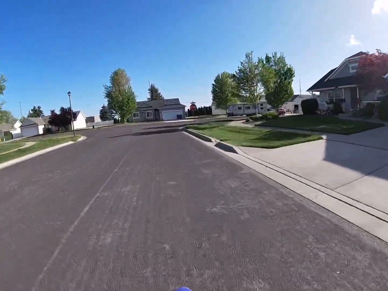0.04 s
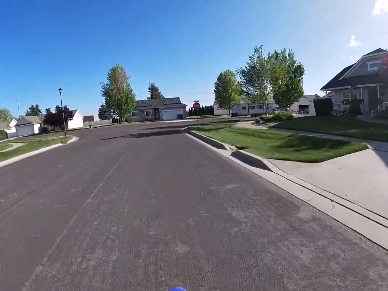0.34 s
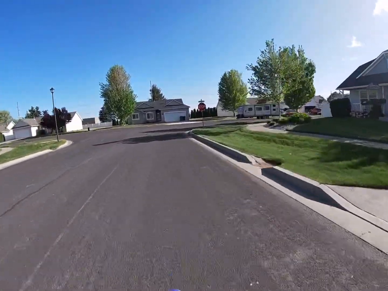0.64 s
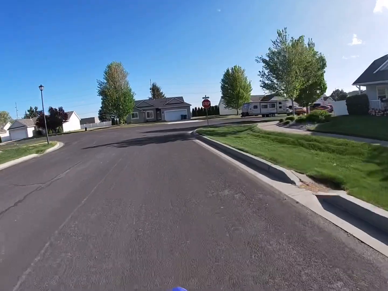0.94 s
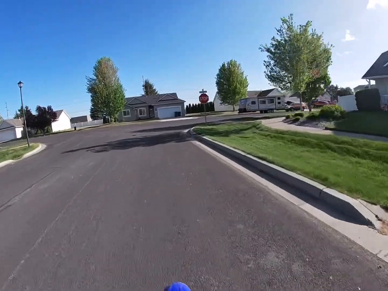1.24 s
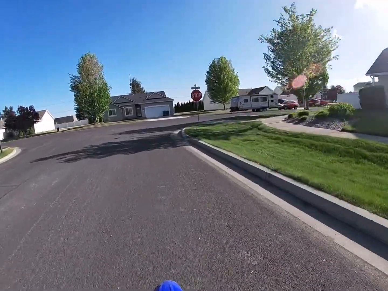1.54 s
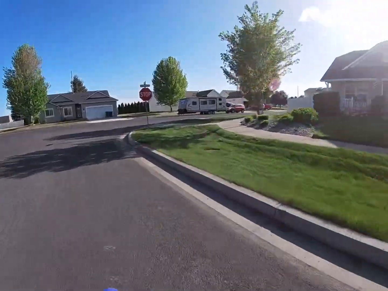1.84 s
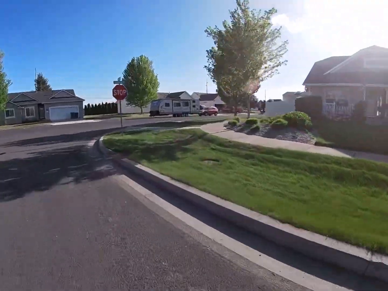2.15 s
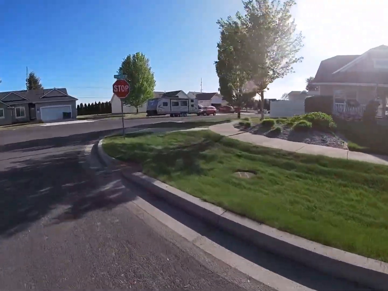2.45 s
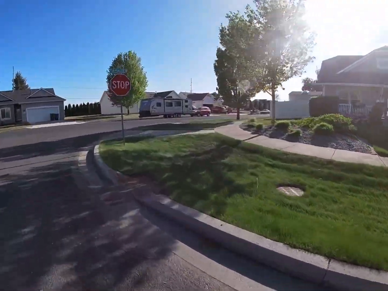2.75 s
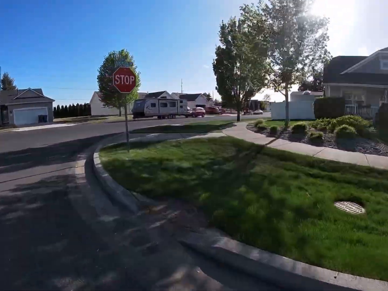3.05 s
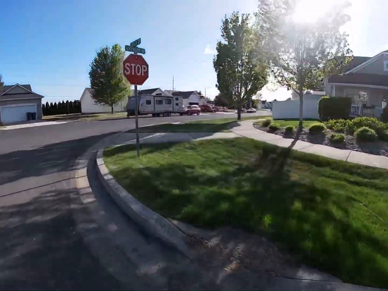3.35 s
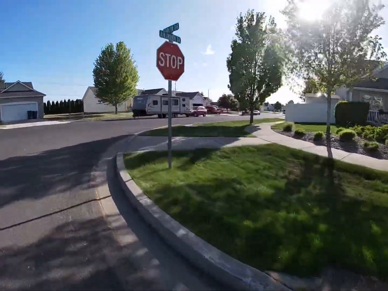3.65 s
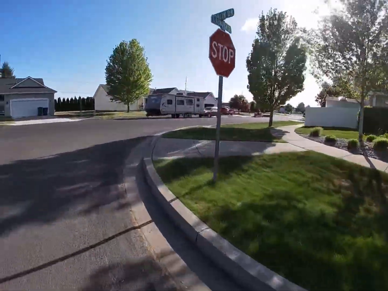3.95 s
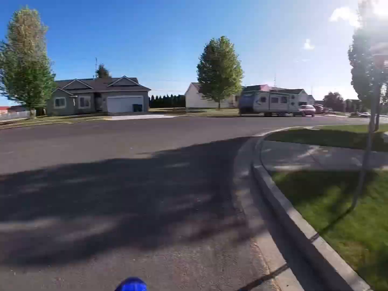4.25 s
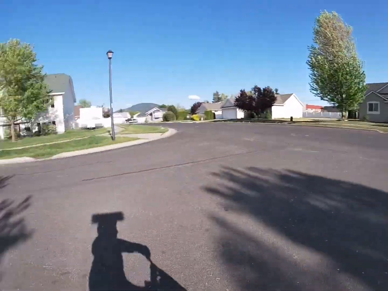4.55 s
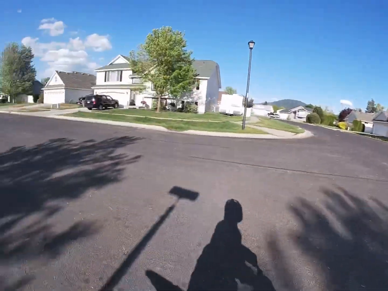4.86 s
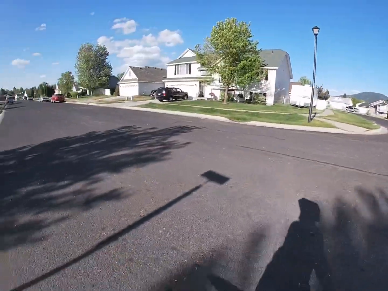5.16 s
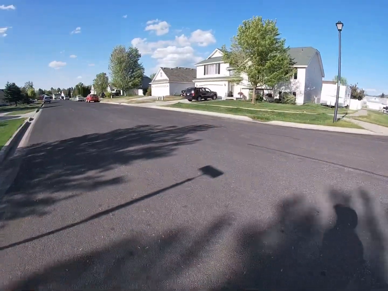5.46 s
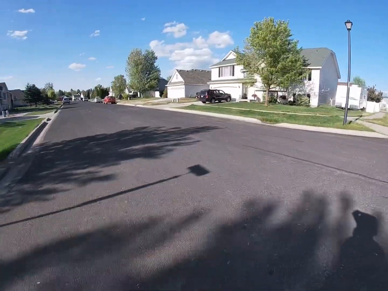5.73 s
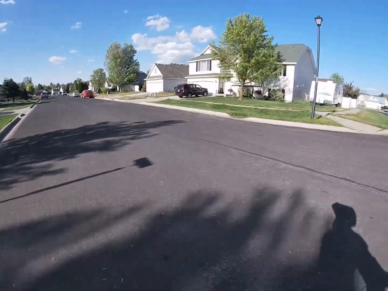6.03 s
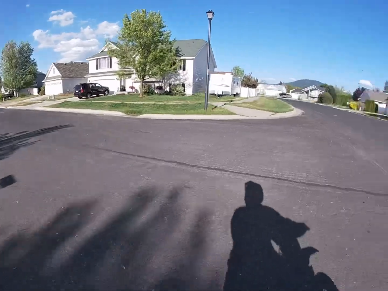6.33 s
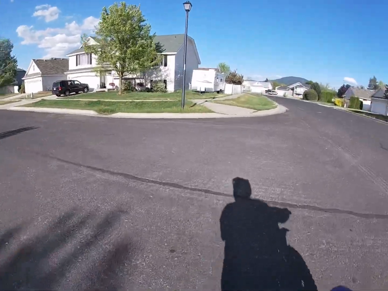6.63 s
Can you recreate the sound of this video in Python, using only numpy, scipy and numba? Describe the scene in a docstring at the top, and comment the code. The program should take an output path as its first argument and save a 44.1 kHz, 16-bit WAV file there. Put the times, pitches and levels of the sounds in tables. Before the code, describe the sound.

A small motorcycle slows with a sputtering exhaust in rumbling wind, knocks rattle briefly, then the engine pulls away gently.

```python
"""At a corner of a dirt track, a single-cylinder four-stroke bike rolls off the throttle, stumbles
down to idle and pulls away gently. Each firing is a pressure pulse that excites the resonances of
the exhaust pipe; gears whine, valves and chain clatter, tyres hiss and panels buzz under load.
Turbulent wind rumbles and buffets on a camera pole fixed to the bike, which knocks as it swings round."""
import sys
import numpy as np
from scipy import signal
from scipy.fft import rfft, irfft
from scipy.io import wavfile
from scipy.ndimage import uniform_filter1d
from numba import njit

SR = 44100
rng = np.random.default_rng(int(sys.argv[2]) if len(sys.argv) > 2 else 0)


def materialize(psi):
    """Save the field psi as 16-bit PCM at rate SR to the path in sys.argv[1].

    A 1-D psi becomes a single channel; in a 2-D psi each row is a channel.
    """
    bounded = np.clip(np.atleast_2d(psi).T, -1, 1)
    quanta = np.round(bounded * 32767).astype(np.int16)
    wavfile.write(sys.argv[1], SR, quanta)


N = 295029
T = np.arange(N) / SR

# steady wind on the microphone, which swings into the lee after the knocks: (time [s], level [dB])
WIND_LEVEL = [(0, -25.5), (1.2, -25.3), (2.0, -20.8), (3.5, -19.8), (4.88, -21), (4.95, -35), (5.9, -26.5),
              (6.69, -27.5)]
# slow swells of the wind: (crest time [s], half length [s], added level [dB])
WIND_SWELLS = [(.6, .12, 4), (1.68, .13, 4), (3.65, .3, 3.5), (4.78, .12, 3.5), (5.37, .08, 14)]
# buffets of air: (time [s], length [s], rumble level [dB], whoosh centre [Hz], width [Hz], level [dB])
WIND_BUFFETS = [(2.922, 0.13, -26, 820, 500, -38), (3.3, 0.12, -36, 1300, 1600, -46),
                (3.58, 0.11, -30.5, 950, 500, -40), (3.765, 0.06, -26, 1050, 1100, -36),
                (3.855, 0.09, -30, 950, 600, -37.5), (3.964, 0.28, -35.5, 980, 450, -46),
                (4.51, 0.065, -25, 1050, 800, -35), (4.582, 0.1, -24, 1000, 600, -35.5),
                (4.688, 0.063, -20.5, 1080, 500, -27), (4.755, 0.06, -28, 950, 400, -36.5),
                (4.853, 0.062, -28, 510, 240, -24.5)]
# spectra of the steady wind and of a buffet: (frequency [Hz], relative level [dB])
RUMBLE_SPECTRUM = [(12, -7), (25, -8), (50, -8), (80, -5.5), (120, -10.5), (200, -17), (400, -41.5),
                   (900, -65)]
BUFFET_SPECTRUM = [(30, 8), (90, 7), (200, 8), (500, 1), (750, -6), (1100, -18), (1500, -19), (2200, -24),
                   (3500, -37), (5000, -56), (9000, -80)]
# knocks of the pole: (time [s], thud level [dB], crack level [dB])
POLE_KNOCKS = [(2.993, -28, -30), (3.33, -38, -33), (3.412, -38, -35), (3.8, -30, -28), (3.83, -27, -25),
               (3.885, -32, -32), (4.489, -36, -30), (4.513, -25, -27), (4.538, -22, -28),
               (4.562, -32, -29), (4.598, -28, -33), (4.618, -26, -34), (4.639, -30, -32),
               (4.661, -23, -21), (4.728, -18, -30), (4.743, -18, -26), (4.775, -32, -33), (4.8, -26, -38),
               (4.833, -25, -31), (4.856, -19, -34), (4.873, -22, -33), (4.899, -25, -32)]
# spectra of the two parts of a knock: (frequency [Hz], relative level [dB])
THUD_SPECTRUM = [(120, -8), (280, 2), (700, 0), (1100, -14), (2000, -32)]
CRACK_SPECTRUM = [(700, -6), (1000, 0), (1800, -5), (3000, -17), (4500, -35), (7000, -55)]
# ticks of loose metal: (time [s], frequency [Hz], level [dB])
METAL_TICKS = [(3.828, 5940, -58), (3.829, 3300, -45), (4.574, 5330, -48), (4.576, 8200, -63),
               (5.377, 5600, -56), (5.545, 9050, -59), (5.603, 5650, -47), (6.003, 10400, -53),
               (6.01, 11800, -51), (6.13, 4700, -50), (6.342, 11900, -61)]

# engine speed: (time [s], firing rate [1/s])
FIRING_RATE = [(0.0, 47.53), (0.5, 43.42), (1.0, 39.86), (1.5, 36.17), (2.0, 33.46), (2.3, 31.63),
               (2.65, 30.42), (2.9, 27.83), (3.2, 26.4), (3.5, 24.09), (3.9, 21.26), (4.3, 19.21),
               (4.7, 17.72), (5.25, 17.88), (5.45, 18.3), (5.65, 20.57), (6.15, 20.92), (6.69, 22.26)]
# twist grip, shut until the corner is turned: (time [s], opening [0-1])
THROTTLE_OPENING = [(5.25, 0), (5.47, .33), (5.57, 1), (5.85, .88), (6.1, .68), (6.4, .35), (6.69, .29)]
# tyre and chain noise: (time [s], level [dB])
CLATTER_ENVELOPE = [(0, -39), (.6, -38), (2, -38), (3.6, -35.8), (4.45, -39), (5.0, -45.5), (5.4, -37.2),
                    (5.8, -36.3), (6.2, -41), (6.69, -41)]
# spectra of that clatter and of its bright top: (frequency [Hz], relative level [dB])
CLATTER_SPECTRUM = [(300, 9.5), (500, 5), (700, 0.5), (1050, -2), (1400, -5.5), (1700, -5.5), (2100, -7.5),
                    (2500, -9.5), (3000, -13.5), (4000, -19), (5000, -31), (7000, -40)]
SIZZLE_SPECTRUM = [(3000, -5.5), (4500, 2), (5200, -4.5), (6200, -3.5), (7300, -16.5), (9500, -15),
                   (11000, -17.5), (12500, -28.5), (14000, -41.5)]
# gear mesh tones: (order [multiple of the firing rate], relative level [dB])
GEAR_ORDERS = [(14, -12), (15, -9), (16, -4), (18, -13), (43, -10), (44, -9), (47, -11), (60, -6), (61, -6),
               (63, -8)]
# resonances of the bike's parts: (frequency [Hz], bandwidth [Hz], relative level [dB])
CYLINDER_MODES = [(2900, 600, 0), (7000, 2500, -18)]
TAPPET_COVER_MODES = [(3750, 900, 0), (5600, 1200, -8)]
CASE_MODES = [(675, 180, 3), (2117, 220, 0.0079)]
PANEL_MODES = [(480, 50, 2), (625, 70, 1), (1050, 300, -1), (1500, 500, -6), (3900, 900, -12),
               (4600, 160, -13), (5800, 700, -17)]
LOOSE_METAL_MODES = [(10500, 700, -3), (12050, 450, 0)]

# firings that miss or bang on the closed throttle: (time [s], level against a normal firing [dB])
STUMBLED_FIRINGS = [(0.342, -4), (0.553, -6), (0.712, -8), (0.838, -7), (0.936, -4), (1.037, -5),
                    (1.138, -5), (1.215, -6), (1.243, -6), (1.321, -6), (1.4, -6), (1.483, -5), (1.54, -6),
                    (1.565, -3), (1.62, -4), (1.68, -4), (1.731, -5), (1.82, -4), (1.85, 1), (1.908, -2),
                    (1.936, 4), (1.995, -9), (2.025, -9), (2.086, -8), (2.148, -6), (2.178, -9),
                    (2.209, -11), (2.24, -2), (2.272, -13), (2.303, 1.5), (2.335, -4), (2.4, -3),
                    (2.465, -6), (2.6, -2), (2.728, 3), (2.759, -5), (2.793, -8), (2.827, 3), (2.9, -3),
                    (2.935, -5), (2.972, 3), (3.01, -6), (3.154, -10.5), (3.232, -7), (3.31, -4),
                    (3.426, -15), (3.51, -3)]
# unburnt mixture popping in the pipe: (time [s], relative level [dB])
AFTERFIRE_POPS = [(.333, -11), (.464, -9), (.487, -9), (.509, -10), (.541, -6), (.654, -11), (.805, -10),
                  (1.066, -9), (1.136, -9), (2.106, -6), (2.385, -8), (2.852, -8)]
# low and upper pipe resonances: (frequency at SLOW_RATE [Hz], bandwidth [Hz], relative level [dB],
# gain per doubling of speed [dB], gain at idle [dB], gain under load [dB])
BOOM_MODES = [(85, 22, 8.9, -15.7, -5.1, 1.2), (135, 72, 3.2, 12.3, 2.9, 10),
              (160, 50, -1.8, 14.6, 2.5, 12.8)]
BARK_MODES = [(280, 72, -8.5, 23, -5.4, 5.2), (366, 78, 4.8, 8.4, -6, 5), (407, 32, .8, 1, -5.5, 7.8),
              (466, 20, -15.2, 3, 3.7, 14)]
# a higher pipe resonance, heard under load and rising as the pipe heats: (time [s], frequency [Hz])
HONK_PITCH = [(5.5, 620), (6.0, 680), (6.5, 745)]
# spectra of ragged burning and of the gas jet: (frequency [Hz], relative level [dB])
GURGLE_SPECTRUM = [(180, 0), (700, 0)]
RASP_SPECTRUM = [(300, -14), (600, -6), (1000, 0), (2000, -5), (4000, -10), (6000, -19), (7500, -31),
                 (12000, -34), (14500, -52)]

SLOW_RATE, KNEE_RATE = 20, 40  # firings per second: reference speed, and where speed gains level off


def undb(db):
    """Amplitude ratio of a level in decibels."""
    return 10 ** (np.asarray(db) / 20)


def unit(x):
    """Normalisation to rms 1."""
    return x / np.sqrt(np.mean(x ** 2))


def curve(table):
    """Linear interpolation of a (time, value) table at every sample."""
    return np.interp(T, *np.transpose(table))


def colour(x, spectrum):
    """Spectral shaping, with a steep roll-off beyond both ends of the table; rms 1."""
    hz, db = np.transpose(spectrum)
    f = np.maximum(np.arange(N // 2 + 1) * SR / N, 1)
    roll_off = np.minimum(1, np.minimum(f / hz[0], hz[-1] / f)) ** 4
    gain = undb(np.interp(np.log(f), np.log(hz), db))
    return unit(irfft(rfft(x) * roll_off * gain, N))


def noise():
    """Gaussian white noise."""
    return rng.standard_normal(N)


def walk(rate):
    """Smooth random fluctuation with about rate new values a second; rms 1."""
    hold = int(SR / rate)
    steps = np.repeat(noise()[:N // hold + 1], hold)[:N]
    return unit(uniform_filter1d(steps, hold))


@njit
def resonator(x, hz, width):
    """Damped second-order resonance with a moving centre, where its gain is 1."""
    y, band_state, low_state, g = np.empty(len(x)), 0., 0., 0.
    for i in range(len(x)):
        if i == 0 or hz[i] != hz[i - 1]:
            g = np.tan(np.pi * hz[i] / SR)
        damping = width / hz[i]
        v = (band_state + g * (x[i] + 1e-18 - low_state)) / (1 + g * (g + damping))
        band_state = 2 * v - band_state
        low_state += 2 * g * v
        y[i] = damping * v
    return y


def ring(x, modes):
    """Superposition of fixed resonances."""
    return sum(undb(db) * resonator(x, np.full(N, float(hz)), float(width)) for hz, width, db in modes)


def band(x, hz, width):
    """Two like resonances in cascade, for steep sides; rms 1."""
    mode = [(hz, width, 0)]
    return unit(ring(ring(x, mode), mode))


def bands(x, modes):
    """Superposition of steep resonances, each at its own level; rms 1."""
    return unit(sum(undb(db) * band(x, hz, width) for hz, width, db in modes))


def puff(age, rise_s):
    """Pulse with quadratic onset and exponential decay, peaking at twice rise_s."""
    u = np.maximum(age, 0) / rise_s
    return u ** 2 * np.exp(-u)


def wind(flicker_db=1.5, grain_db=2.2, edge_s=.015, muffle_hz=2600):
    """Turbulent pressure on the microphone: a swelling rumble, and a buffet and whoosh as eddies hit."""
    swells_db = sum(db * np.exp(-((T - s) / half) ** 2) for s, half, db in WIND_SWELLS)
    flicker = undb(flicker_db * walk(8.8))
    out = colour(noise() * flicker, RUMBLE_SPECTRUM) * undb(curve(WIND_LEVEL) + swells_db)
    eddies = undb(grain_db * walk(250))
    buffet = colour(noise() * eddies, BUFFET_SPECTRUM)
    air = signal.sosfilt(signal.butter(4, muffle_hz, fs=SR, output="sos"), noise() * eddies)
    for s, length, db, hz, width, whoosh_db in WIND_BUFFETS:
        gust = np.clip(np.minimum(T - s, s + length - T) / edge_s + .5, 0, 1)
        out += gust * (undb(db) * buffet + undb(whoosh_db) * band(air, hz, width))
    return out


def knocks(decay_s=.005):
    """Damped impacts: the pole thuds and cracks in its mount, and loose metal ticks brightly."""
    def struck(s):
        return (T >= s) * np.exp(-np.clip((T - s) / decay_s, 0, 20))
    thuds = noise() * sum(undb(db) * struck(s) for s, db, _ in POLE_KNOCKS)
    cracks = noise() * sum(undb(db) * struck(s) for s, _, db in POLE_KNOCKS)
    out = np.std(thuds) * colour(thuds, THUD_SPECTRUM) + np.std(cracks) * colour(cracks, CRACK_SPECTRUM)
    grit = noise()
    for s, hz, db in METAL_TICKS:
        tap = undb(db) * struck(s) * grit
        out += np.std(tap) * band(tap, hz, width=1100)
    return out


def facing_db(start_s=4.35, swing_s=.5, gain_db=11.5):
    """Directivity: rasp and sizzle gain level as the camera swings round to face the engine."""
    return gain_db * np.clip((T - start_s) / swing_s, 0, 1)


def below_knee(octaves):
    """Saturation: speed in octaves, levelling off at KNEE_RATE."""
    return np.minimum(octaves, np.log2(KNEE_RATE / SLOW_RATE))


def engine_state(rate, full_opening=.33, idle_rate=18.3, catch_rate=21.2, lean_rate=32, lean_octaves=.45):
    """Speed and throttle govern combustion: the cylinder fills under load, else idles or burns lean."""
    octaves = np.log2(rate / SLOW_RATE)
    throttle = curve(THROTTLE_OPENING)
    charge = np.minimum(throttle / full_opening, 1)
    idle_jet = np.clip((catch_rate - rate) / (catch_rate - idle_rate), 0, 1)
    idle = (1 - charge) * idle_jet
    lean = (1 - charge) * np.exp(-(np.log2(rate / lean_rate) / lean_octaves) ** 2)
    return octaves, throttle, charge, idle, lean


def running_gear(cycle, state, age, strength, grain_db=1.5, flutter_db=.8):
    """Rolling and impact noise: tyres hiss, chain and valves clatter, piston slaps, a tappet ticks."""
    octaves, _, charge, idle, lean = state
    valve_taps = np.exp(-(cycle % .5) / .018)  # twice a cycle
    rattle = (1 + .17 * valve_taps) * undb(grain_db * walk(900) + flutter_db * walk(30))
    clatter = colour(noise() * rattle, CLATTER_SPECTRUM) * undb(curve(CLATTER_ENVELOPE))
    sizzle_db = -72 + 16.5 * below_knee(octaves) - 7 * idle + facing_db()
    sizzle = colour(noise() * rattle, SIZZLE_SPECTRUM) * undb(sizzle_db)
    impacts = noise() * strength * puff(age, rise_s=.002)
    slap = bands(impacts, CYLINDER_MODES) * (1 - idle - charge) * undb(-66 + 13 * lean)
    tappet = bands(impacts, TAPPET_COVER_MODES) * idle * undb(-65)
    return clatter + sizzle + slap + tappet


def gear_whine(cycle, rate, whine_db=-48.5, chatter_db=-55, waver=.75):
    """Mesh tones swell as they sweep through the case resonances; loose teeth chatter in the upper one."""
    mesh = sum(undb(db) * np.sin(2 * np.pi * order * cycle + waver * order / 20 * walk(70))
               for order, db in GEAR_ORDERS)
    whine = ring(ring(rate ** 2 * mesh, CASE_MODES), CASE_MODES)
    upper_hz, upper_width, _ = CASE_MODES[1]
    chatter = band(noise() * rate ** 1.5, upper_hz, upper_width)
    return unit(whine) * undb(whine_db) + chatter * undb(chatter_db)


def bodywork(state, age, decay_s=.05, grain_db=4, fits_db=6):
    """Forced vibration: under load each firing sets panels and guards buzzing and loose metal jingling."""
    throttle = state[1]
    shake = noise() * np.exp(-age / decay_s) * undb(grain_db * walk(400))
    buzz = bands(shake, PANEL_MODES) * undb(-42.5)
    jingle = bands(shake * undb(fits_db * walk(70)), LOOSE_METAL_MODES) * undb(-75)
    return (buzz + jingle) * throttle


def firings(cycle, lean, advance_s=.0016, shift_s_per_db=.0001):
    """Cyclic variation: age [s] and strength of the latest firing; lean ones scatter, weak come early."""
    count = np.arange(int(cycle[-1]) + 1)
    chance = rng.standard_normal((len(count), 2))
    times = np.interp(count, cycle, T, left=0) - advance_s
    uneven = np.interp(times, T, lean)
    jitter_s = .00004 + .00015 * uneven ** 2
    times += jitter_s * chance[:, 0]
    db = (.2 + .7 * uneven) * chance[:, 1]
    for s, stumble_db in STUMBLED_FIRINGS:
        db[np.argmin(abs(times - s))] = stumble_db
    times += shift_s_per_db * db
    latest = np.maximum(np.searchsorted(times, T) - 1, 0)
    return T - times[latest], undb(db)[latest]


def pipe(push, modes, state, tuning_per_octave=.11):
    """Modes of a gas column, alternating in sign; hotter gas at higher engine speed raises their pitch."""
    octaves, _, charge, idle, _ = state
    tuning = 1 + tuning_per_octave * octaves
    out = np.zeros(N)
    for k, (hz, width, db, speed_db, idle_db, load_db) in enumerate(modes):
        gain = undb(db + speed_db * below_knee(octaves) + idle_db * idle + load_db * charge)
        out += (-1) ** k * gain * resonator(push, hz * tuning, float(width))
    return out


def exhaust(rate, state, age, strength, push_s=.0005, valve_lead_s=.002, jet_lag_s=.0006, tail_s=.018):
    """Impulse excitation: each blowdown or afterfire rings the pipe; the turbulent outlet jet rasps."""
    octaves, throttle, charge, idle, lean = state
    size = np.sqrt(SLOW_RATE / rate)  # slower firings each carry more of the power
    opened = age - valve_lead_s  # the blowdown follows the first crack of the valve
    turbulence = 1 + (.02 + .06 * lean) * walk(1500)
    blowdown = size * puff(opened, push_s) * turbulence
    pops = size * sum(undb(db) * puff(np.minimum(T - s, .1), push_s) for s, db in AFTERFIRE_POPS)
    # a weak firing loses less boom than bark
    boom = -pipe(blowdown * strength ** .55 + pops, BOOM_MODES, state) * undb(.2)
    # ragged burning keeps the pipe ringing between firings
    gurgle = .02 * size * np.sqrt(lean) * colour(noise(), GURGLE_SPECTRUM)
    bark = pipe(blowdown * strength + pops + gurgle, BARK_MODES, state) * undb(1.1)
    jet = puff(age - jet_lag_s, rise_s=.0023) + .13 * np.exp(-age / tail_s)
    flutter = undb(1.5 * walk(60) + 1.5 * walk(800))
    rasp_db = -74 + 22.6 * throttle + 20 * lean - 10 * idle + facing_db()
    rasp = colour(noise() * size * strength * jet * flutter, RASP_SPECTRUM) * undb(rasp_db)
    tone_bursts = puff(opened, rise_s=.0016) * np.sin(2 * np.pi * curve(HONK_PITCH) * opened)
    honk = unit(size * strength * tone_bursts) * charge * undb(-45.5)
    return boom + bark + honk + rasp


def scene():
    """Superposition: the crankshaft times the bike's sources; the air and the pole add their own."""
    rate = curve(FIRING_RATE)
    cycle = np.cumsum(rate) / SR + .2  # engine phase, one unit per firing
    state = engine_state(rate)
    age, strength = firings(cycle, lean=state[-1])
    bike = exhaust(rate, state, age, strength) + running_gear(cycle, state, age, strength)
    bike += gear_whine(cycle, rate) + bodywork(state, age)
    return (bike + wind() + knocks())[None]


def record(dry, ceiling=1.1, top_hz=14500):
    """Soft saturation rounds the loudest peaks, and a steep low-pass cuts the top."""
    rounded = ceiling * np.tanh(dry / ceiling)
    return signal.sosfilt(signal.ellip(8, .2, 70, top_hz, fs=SR, output="sos"), rounded)


dry = scene()
out = record(dry)
materialize(out)
```